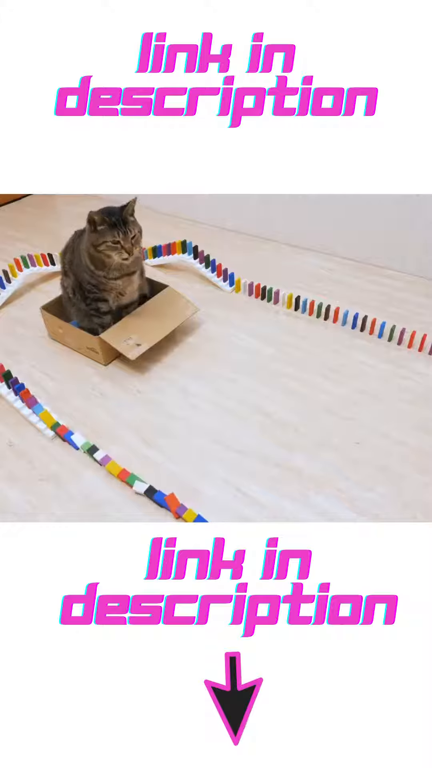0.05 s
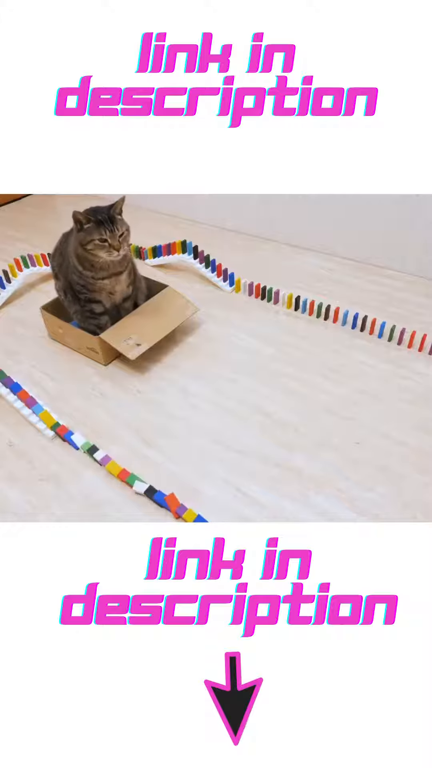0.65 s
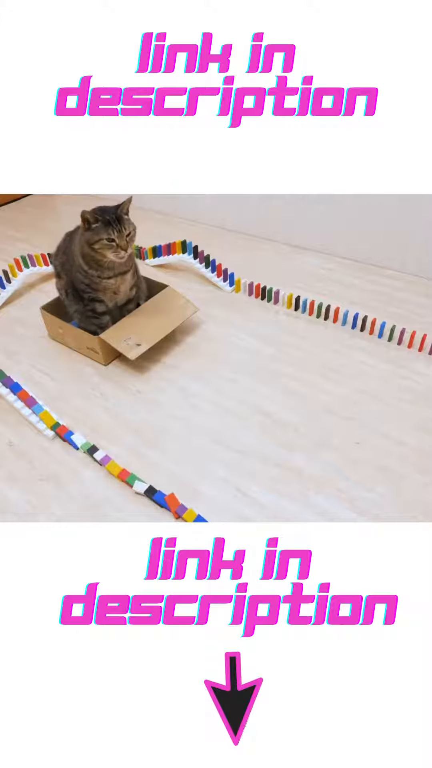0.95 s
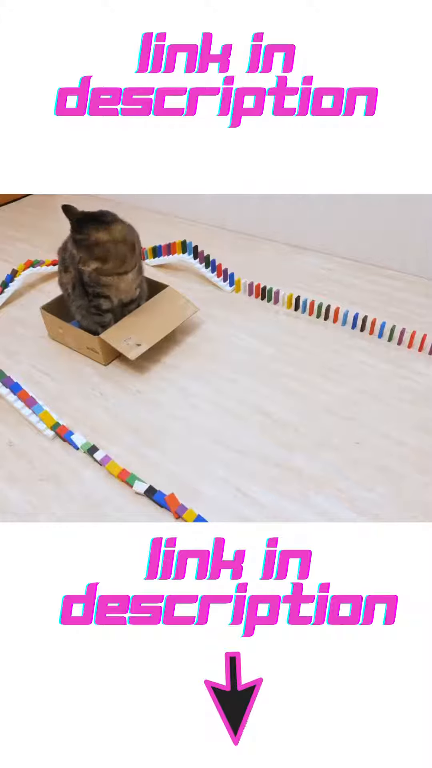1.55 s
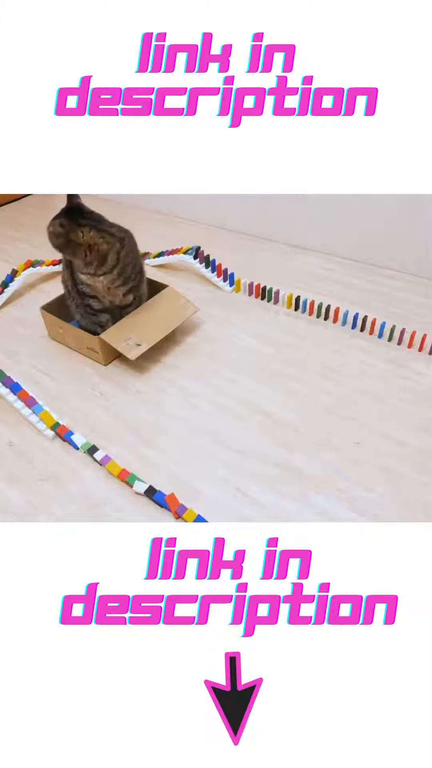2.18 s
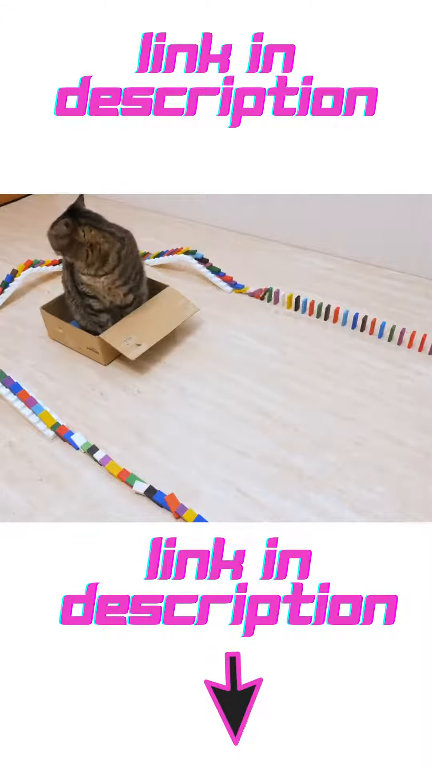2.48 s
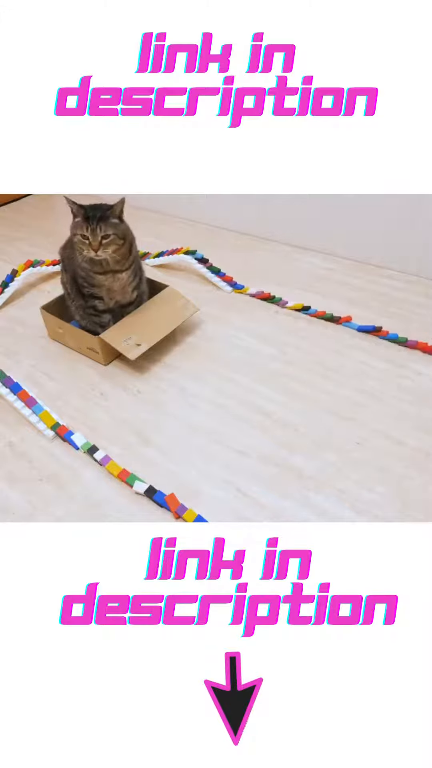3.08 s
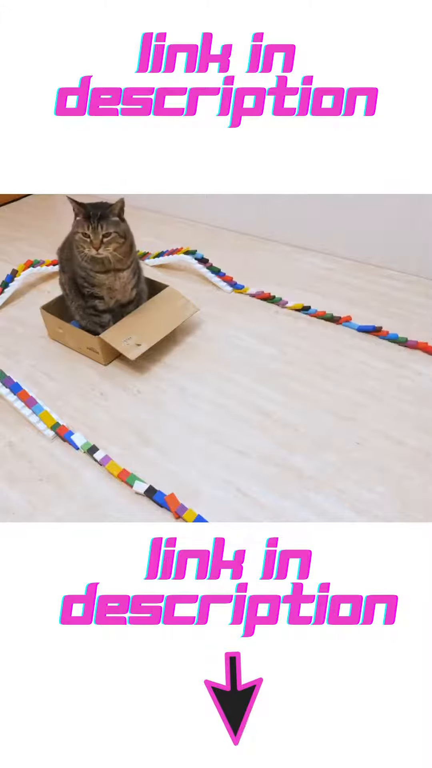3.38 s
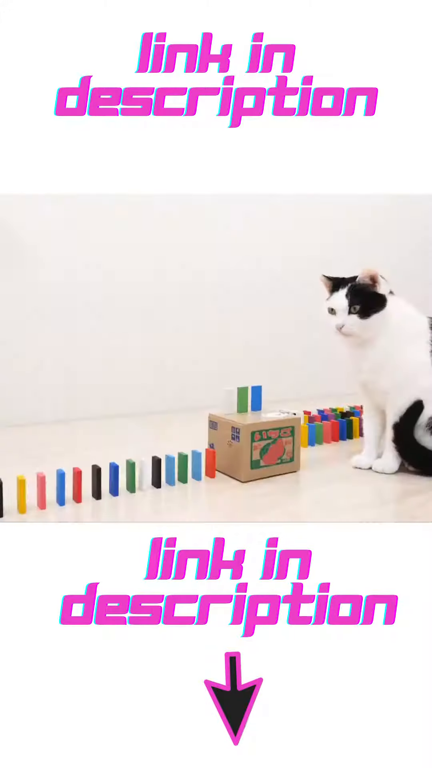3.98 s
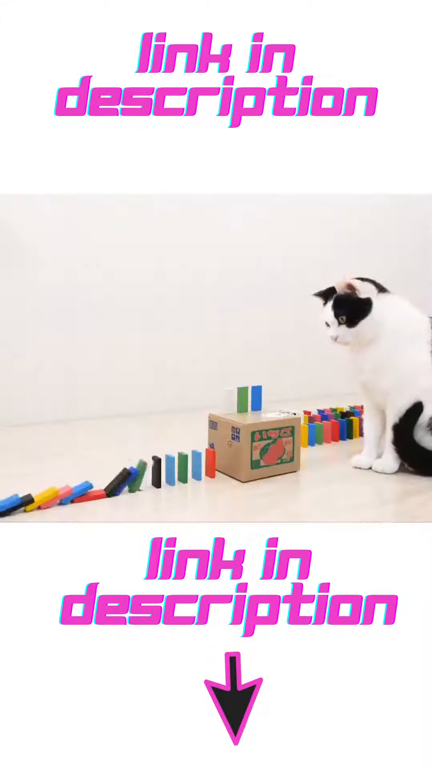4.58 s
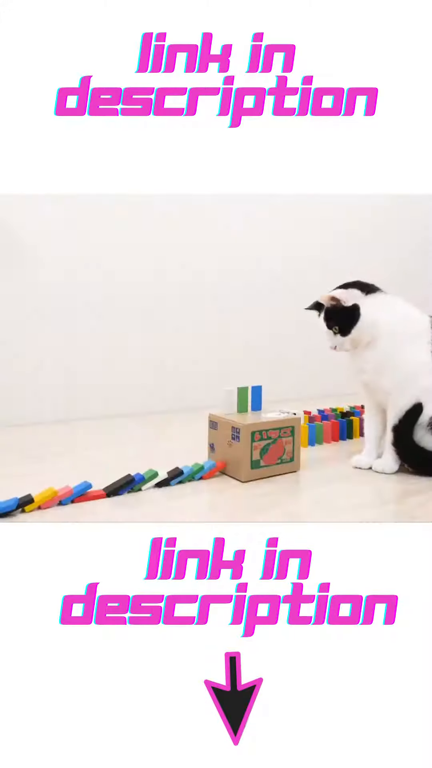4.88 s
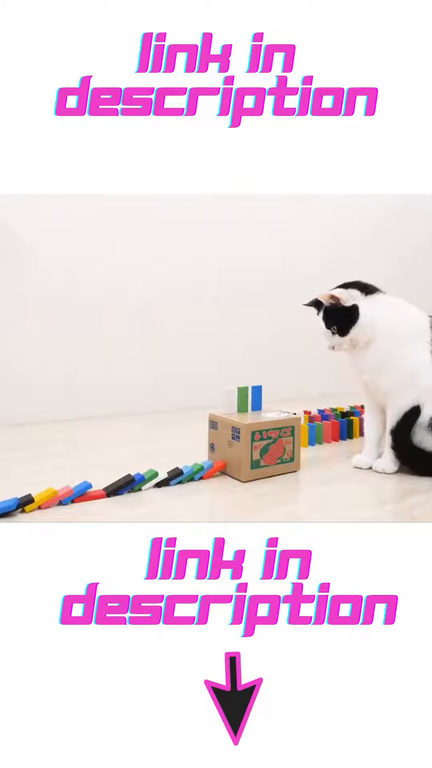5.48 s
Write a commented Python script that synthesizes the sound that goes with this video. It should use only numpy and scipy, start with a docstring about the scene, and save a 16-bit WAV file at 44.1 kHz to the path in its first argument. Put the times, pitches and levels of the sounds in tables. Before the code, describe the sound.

Small dominoes fall in a rapid, dense rattle of clicks indoors, until the last one taps a hollow cardboard box.

```python
"""A bare room with a wooden floor, one microphone: a long chain of plastic dominoes topples.
At a steady pace each tile clicks against the next and sets the fallen ones chattering and drumming
on the floor: light, high ticks in some stretches, a lower, dense rush where they crowd. Clicks and
chatter are noise bursts through five resonant voices: thud, body, clack, ring, edge.
The last tile knocks on a hollow cardboard box. Faint hiss and rumble lie underneath."""
import sys
import numpy as np
from scipy import signal
from scipy.fft import rfft, irfft, next_fast_len
from scipy.io import wavfile
from scipy.ndimage import uniform_filter1d

SR = 44100
rng = np.random.default_rng(int(sys.argv[2]) if len(sys.argv) > 2 else 0)


def persist_wave(psi):
    """Save psi, clipped to +-1, as 16-bit WAV."""
    counts = np.round(np.clip(psi, -1, 1) * 32767).astype(np.int16)
    wavfile.write(sys.argv[1], SR, np.atleast_2d(counts).T)


N = 253134

# Levels are relative; widths are resonance widths.
# clearest tile-on-tile strikes: time_s, treble_db, clack_db, edge_db, ring_hz
CLEAR_STRIKES = [(0.0872, -45, -42, -51, 8600), (0.1155, -33, -52, -53, 8800),
                 (0.1424, -39, -45, -52.5, 8400), (0.1773, -29, -45, -59.5, 9200),
                 (0.225, -23, -49, -56.5, 9200), (0.309, -42, -61, -64, 8500),
                 (0.3183, -39.5, -52, -66, 8550), (0.3534, -34, -54, -52, 8300),
                 (0.3597, -28.5, -59, -49, 8500), (0.4076, -33, -40.5, -45, 8240),
                 (0.4541, -29, -42, -54, 8370), (0.4911, -32, -41, -48, 8520),
                 (0.523, -24.5, -39.5, -54.5, 7280), (0.556, -28, -41, -57, 7430),
                 (0.574, -29, -48, -46.5, 7100), (0.5791, -22, -36, -49, 7500),
                 (0.5996, -25.5, -27.5, -43, 7080), (0.6318, -27.5, -21, -38, 7200),
                 (0.637, -21.5, -32, -41, 8900), (0.6619, -19.5, -40, -49, 8900),
                 (0.679, -24.5, -40, -49, 8900), (0.713, -19.5, -37, -43, 10560),
                 (0.768, -23.5, -29.5, -32, 8580), (0.919, -22, -43, -41.5, 8650),
                 (0.9359, -21, -53, -40, 8900), (0.9805, -14, -31, -38, 8950),
                 (0.9907, -27, -31, -41, 8400), (1.0703, -26.5, -25, -40, 8300),
                 (1.1285, -18, -32.5, -30, 8770), (1.1535, -22, -60, -40, 8370),
                 (1.2441, -30, -49, -64, 8000), (1.294, -24.5, -45.5, -42, 8100),
                 (1.375, -34.5, -65, -42, 9700), (1.415, -40, -48, -53, 8300),
                 (1.4474, -32, -42, -48.5, 8600), (1.479, -23, -62, -41.5, 7300),
                 (1.482, -12.5, -37, -29.5, 8450), (1.51, -17, -37.5, -22.5, 8100),
                 (1.5406, -12, -33, -26, 10230), (1.6479, -17.5, -32.5, -54.5, 9050),
                 (1.845, -24.5, -27, -47.5, 8800), (1.8844, -22, -23, -34.5, 8600),
                 (1.9042, -16.5, -32, -32.5, 9450), (1.9281, -20, -22.5, -45, 7600),
                 (1.9996, -28, -22.5, -50, 7200), (2.062, -25.5, -26.5, -39.5, 7700),
                 (2.106, -28.5, -35.5, -59, 8720), (2.166, -32, -53, -57.5, 9400),
                 (2.2084, -24.5, -68, -61, 8400), (2.3412, -21, -44, -42, 8200),
                 (2.372, -27.5, -40, -43, 8330), (2.4091, -25.5, -35, -29, 8300),
                 (2.436, -26, -37, -45, 8600), (2.464, -22.5, -37.5, -47, 8630),
                 (2.4975, -19, -49, -39, 8540), (2.5229, -26, -34, -30, 9350),
                 (2.559, -16.5, -29, -29.5, 7860), (2.639, -20, -32.5, -41, 7990),
                 (2.655, -19, -24, -40.5, 8370), (2.6964, -16.5, -31, -43.5, 8320),
                 (2.7935, -26, -26, -39.5, 11800), (2.8245, -18.5, -22.5, -31.5, 11900),
                 (2.849, -22.5, -36, -36.5, 11900), (2.8698, -20, -27, -48.5, 12800),
                 (2.8772, -44.5, -38, -43.5, 8400), (2.904, -40, -34, -48, 8500),
                 (2.9252, -29.5, -46, -48, 8400), (2.96, -24, -56, -52, 8770),
                 (3.0158, -26, -35, -40.5, 8330), (3.1254, -20, -34, -44.5, 8480),
                 (3.1822, -33, -32, -46, 8660), (3.2533, -36, -26.5, -56, 8450),
                 (3.294, -24, -30, -39.5, 13500), (3.3251, -28, -38, -36, 13400),
                 (3.3977, -28.5, -33.5, -32.5, 10980), (3.5031, -43, -46, -48.5, 8280),
                 (3.5542, -27, -34.5, -39, 9950), (3.6571, -44.5, -31.5, -51, 8400),
                 (3.6638, -18, -32, -22.5, 9630), (3.6849, -19, -41, -33.5, 13100),
                 (3.7295, -35, -69, -43.5, 7950), (3.765, -38, -48, -35.5, 8150),
                 (3.7838, -27.5, -39, -39.5, 9150), (3.8116, -33, -39.5, -34, 7700),
                 (3.8414, -26, -36, -35, 10350), (3.859, -42, -39, -40, 8100),
                 (3.8691, -39, -39, -50, 8600), (3.8795, -31, -36, -31.5, 8200),
                 (3.902, -25, -34, -31.5, 9100), (3.912, -27.5, -38, -38.5, 10900),
                 (3.919, -31, -39, -37.5, 8800), (3.9255, -31.5, -46, -33.5, 9000),
                 (3.9488, -29, -37, -44, 7800), (3.9674, -31, -38, -48.5, 8400),
                 (3.9872, -23, -30, -41.5, 9000), (3.995, -24, -46, -42.5, 9170),
                 (4.0056, -31.5, -38, -46.5, 8500), (4.028, -20, -37, -34.5, 9200),
                 (4.035, -30.5, -30, -45.5, 8900), (4.0495, -31, -51, -39.5, 9500),
                 (4.0574, -47, -40, -47, 8500), (4.1176, -23, -42, -45, 8250),
                 (4.1604, -34, -32.5, -45, 8100), (4.195, -40, -37, -57, 8320),
                 (4.2278, -30, -31, -47.5, 9500), (4.254, -28.5, -34, -44, 11180),
                 (4.2766, -34, -30, -37, 8900), (4.2936, -26.5, -35, -39.5, 8600),
                 (4.313, -26, -30, -42, 8900), (4.3422, -35.5, -33.5, -49.5, 8550),
                 (4.3666, -30, -43, -43.5, 8500), (4.392, -30, -32.5, -46.5, 8800),
                 (4.419, -24, -29.5, -40, 8850), (4.4443, -27.5, -29.5, -46, 8000),
                 (4.4743, -25.5, -34, -42.5, 8450), (4.499, -31, -35, -45.5, 8700),
                 (4.5092, -35.5, -31, -50, 8500), (4.5491, -30, -34.5, -41, 8270),
                 (4.5575, -41, -34.5, -53, 8400), (4.5794, -27.5, -32, -38.5, 8400),
                 (4.6058, -24, -36, -48, 8400), (4.6362, -24, -33, -54, 8400),
                 (4.6632, -20.5, -37, -52.5, 8260), (4.6924, -44, -36, -53, 8200),
                 (4.7046, -36, -38, -49, 8250), (4.7254, -29, -35.5, -46.5, 8320),
                 (4.7465, -31, -43, -39.5, 8300), (4.7533, -27, -41, -50.5, 8300),
                 (4.764, -49, -49, -55, 8340), (4.776, -22.5, -38, -30.5, 8900),
                 (4.806, -29, -40, -50, 12100), (4.832, -35, -34, -45, 11700),
                 (4.8374, -34, -31.5, -53, 8650), (4.86, -29, -35, -36.5, 8500),
                 (4.87, -29, -32, -38, 8400), (5.038, -52, -45.5, -76, 8500)]
# strike character along the chain: time_s, tiles_per_s, nearness_db, ring_t60_s, scuff_db
CHAIN = [(.1, 22, 2.5, 0.037, -18), (.47, 24, -1.5, 0.019, -22), (.7, 35, -4, 0.041, -14.5),
         (1.7, 32.5, -1.5, 0.073, -1), (2.35, 36, 0, 0.035, -18), (2.9, 39.2, -2, 0.043, -17),
         (3.66, 36, 2.5, 0.0087, -7), (3.85, 36, 3, 0.0064, -15), (4.3, 51, -0.5, 0.016, -23),
         (4.85, 36, 0.5, 0.01, -21)]
# chatter grain: time_s, contacts_per_s, size_spread_db, flare_db
GRAIN = [(.1, 1400, -2.5, -1), (.42, 430, -1.5, 17), (.65, 1020, -2.5, 4), (1.9, 1480, -0.5, 2),
         (3.6, 1340, 4.5, 3), (3.85, 466, -7, -8), (4.8, 500, 2, 18.5)]
# voices thud, body, clack, ring, edge: low_hz, high_hz, chatter_db, click_db
VOICES = [(244, 1070, -1.5, -32), (690, 3000, 0, -15), (2900, 6050, -3, -15), (6370, 10020, -1.5, -27.5),
          (10050, 15300, -1, -16)]
# broad tile spectrum: freq_hz, density_db
TILE_SPECTRUM = [(410, -29.5), (700, -12.5), (1110, -12), (1660, -9.5), (2300, -8), (3000, -9),
                 (4000, -7.5), (5260, -7), (6400, -11.5), (8650, -12.5), (11100, -24), (13300, -22.5),
                 (15400, -22.5), (16000, -26)]
# thud, floor drumming under the tiles: time_s, level_db, pitch_hz, width_hz
FLOOR_MODE = [(0, -54.5, 463, 201), (.3, -79, 420, 200), (.6, -66, 440, 201), (.64, -55, 504, 110),
              (.72, -52.5, 384, 120), (.83, -45.5, 295, 100), (.88, -52.5, 300, 89), (.98, -43, 315, 74),
              (1.08, -50.5, 300, 59), (1.16, -80, 294, 80), (1.4, -78.5, 330.3, 200),
              (1.52, -56.5, 359, 152.7), (1.63, -44, 400, 111), (1.77, -53, 288, 140),
              (1.88, -44.5, 473, 235), (2, -48, 520, 195), (2.07, -52, 326, 80), (2.22, -104.5, 403, 200),
              (2.45, -68, 414, 205), (2.59, -42, 503, 140), (2.75, -47.5, 453, 256),
              (2.9, -42.5, 518, 109.6), (3, -47, 472.4, 100), (3.09, -41.5, 445, 50),
              (3.17, -44.5, 418, 200), (3.25, -40.5, 350, 286), (3.35, -49, 470, 203),
              (3.65, -46, 435, 169), (3.78, -54, 348.5, 119), (4.05, -53.5, 396, 171), (4.3, -49, 353, 150),
              (4.87, -52.5, 372, 149)]
# body, low mids: time_s, level_db
BODY_LEVEL = [(0, -45.5), (.25, -54), (.47, -53.5), (.64, -36), (.77, -46.5), (1.08, -48), (1.3, -59),
              (1.5, -49), (1.65, -39), (1.83, -47.5), (2.28, -55), (2.6, -45.5), (3.75, -47.5),
              (4.28, -42.5), (4.87, -44)]
# hollow body resonance: time_s, pitch_hz, width_hz, prominence_db
BODY_MODE = [(0, 1580, 703, 0.5), (.4, 1430, 605, 9), (.56, 1710, 300, 8.5), (.64, 1910, 425, 21.5),
             (.75, 1990, 500, 1), (1.1, 1740, 500, -0.5), (1.3, 1380, 594, 10), (1.56, 1677, 403, 3),
             (1.66, 1660, 256, 6.5), (1.8, 2340, 595, -12.5), (2.1, 1840, 600, -7.5), (2.3, 1320, 600, 13),
             (2.55, 1700, 400, -2), (2.9, 1740, 393.4, -4.5), (3.6, 1830, 400, -4), (3.9, 2350, 700, -28),
             (4.3, 2220, 625, -2), (4.87, 2130, 609, 0)]
# clack, force of the rush: time_s, level_db
CLACK_LEVEL = [(0, -33), (.08, -38), (.24, -52), (.47, -52.5), (.64, -28), (.76, -33.5), (.89, -43.5),
               (1.0, -26.5), (1.13, -42.5), (1.22, -57.5), (1.43, -50), (1.58, -32), (1.7, -26.5),
               (1.78, -38), (1.93, -26.5), (2.01, -32.5), (2.25, -59.5), (2.5, -38.5), (2.65, -27),
               (2.75, -32), (2.9, -25), (3.02, -34.5), (3.34, -31.5), (3.66, -36.5), (3.76, -47),
               (3.95, -35.5), (4.3, -38), (4.87, -37.5)]
# lower band edge of the clack: time_s, low_hz
CLACK_LOW = [(0, 2830), (.6, 2920), (1.1, 3000), (1.55, 3060), (1.68, 2400), (1.8, 2400), (1.92, 3050),
             (2.5, 2780), (3.65, 2875), (3.85, 2700), (4.87, 2540)]
# main resonance, narrow where tiles lie alike: time_s, pitch_hz, width_hz, prominence_db, overtone_db
CLACK_MODE = [(0, 4300, 1200, -14, -5), (.35, 4900, 700, 1, -7.5), (.6, 4480, 890, 7, -13),
              (.7, 4250, 1300, -17.5, -5), (.82, 3300, 550, 13, -12.5), (.96, 3400, 505, 11.5, -6.5),
              (1.03, 3460, 764, -1, -2.5), (1.3, 5030, 900, 2.5, -7), (1.56, 4540, 1100, 2.5, -11),
              (1.64, 3920, 1500, -3.5, -12), (1.72, 3150, 910, 25.5, -15), (1.81, 3400, 805, 18, -22.5),
              (1.92, 3845, 930, -3.5, -8), (2.1, 4260, 1310, -10, 9.5), (2.45, 4480, 710, 11, -12),
              (2.54, 3870, 1475, -5, -41), (2.6, 3530, 610, 14, -4.5), (2.9, 3400, 385, 15.5, -9),
              (3.1, 3440, 340, 15.5, -16.5), (3.35, 3495, 300, 16, -10.5), (3.68, 3480, 300, 7.5, -3.5),
              (3.8, 3860, 1200, 4.5, -5.5), (4.05, 3760, 1300, 13, -0.5), (4.3, 3320, 1280, 0.5, -11),
              (4.87, 3700, 1280, 10, -8.5)]
# treble, ring and edge: time_s, level_db
TREBLE_LEVEL = [(0, -39), (.12, -51), (.44, -61.5), (.65, -33.5), (.85, -53), (.98, -36.5), (1.06, -63),
                (1.15, -38), (1.26, -68.5), (1.45, -46), (1.529, -33), (1.8, -48), (1.93, -41), (2.05, -43),
                (2.18, -52.5), (2.33, -64.5), (2.58, -42), (2.7, -41), (3.05, -47), (3.25, -45.5),
                (3.38, -41), (3.8, -47.5), (3.98, -42.5), (4.15, -44), (4.87, -49.5)]
# bright tile ring: time_s, pitch_hz, width_hz, prominence_db
RING_MODE = [(0, 9000, 700, 12), (.45, 8700, 600, 1), (.55, 7200, 600, 3.5), (.65, 7400, 700, 11),
             (.76, 8600, 700, 0.5), (.97, 9070, 350, 13), (1.2, 8350, 600, 3), (1.5, 8000, 900, 3.5),
             (1.68, 8800, 700, 13.5), (1.92, 8600, 800, 12), (2.35, 8300, 600, 1.5),
             (2.52, 7540, 900, -7.5), (2.68, 8600, 600, 12), (3.4, 8450, 600, -8.5), (3.9, 8300, 700, -2.5),
             (4.3, 9000, 600, 4.5), (4.87, 8100, 500, 2)]
# edge voice against the treble: time_s, offset_db
EDGE_TILT = [(0, 0), (.6, -14), (.98, 2), (1.17, 3), (1.27, -20), (1.45, -4.5), (1.57, -4), (1.7, -5),
             (1.9, -5), (2.6, -1), (2.85, 3), (3.12, -7.5), (3.35, 0.5), (3.9, -5), (4.1, -3), (4.87, -7.5)]
# a sliding edge sings briefly: start_s, length_s, pitch_hz, prominence_db
GLINTS = [(1.497, 0.11, 10900, 6.5), (1.69, 0.064, 12000, 13), (2.73, 0.14, 12000, 18.5),
          (3.275, 0.082, 13700, 28), (3.37, 0.049, 11200, 16.5), (3.537, .07, 14600, 9.5),
          (4.236, 0.057, 11200, 17), (4.747, .11, 12070, 17.5)]
# last tile hits the box and bounces: time_s, level_db
KNOCKS = [(4.8854, -15.5), (4.8892, -19), (4.8913, -15)]
# cardboard wall modes: pitch_hz, level_db, t60_s
BOX_MODES = [(664, 9, 0.06), (1182, 6, 0.089), (1271, 2.5, 0.061), (1365, -2, 0.041), (1520, -16, 0.035),
             (1652, -15, 0.054)]
# room decay: freq_hz, t60_s
ROOM_DECAY = [(300, 0.85), (650, 0.49), (1200, 0.51), (2400, 0.63), (6000, 0.51), (9000, 0.39),
              (14000, 0.36)]
# room hiss: freq_hz, density_db
HISS_SPECTRUM = [(15, -28.5), (25, -15), (61, -28), (173, -10.5), (253, -14), (313, -15.5), (523, -22.5),
                 (648, -3), (762, -18), (826, -8.5), (4040, -17.5), (6550, -20.5), (8130, -15),
                 (10100, -25), (15500, -29)]
# room rumble: time_s, level_db
RUMBLE_LEVEL = [(0, -90), (1.7, -86.5), (2.4, -85.5), (3.3, -78), (4.1, -76.5), (5.1, -94), (5.74, -100)]

BOX_HIT_S = KNOCKS[0][0]
TIME_S = np.arange(N) / SR


def clicks(crack_t60_s, slide_db, slide_t60_s, scuff_t60_s, rebound_db, ring_db):
    """Each tile slides into a crack, rebounds within milliseconds, scuffs and rings."""
    lead_s, fft_size = .015, 4096
    track, t = np.zeros(N), np.arange(SR // 16) / SR - lead_s
    hz = np.fft.rfftfreq(fft_size, 1 / SR) + 1
    ring_band = rfft(band(signal.unit_impulse(fft_size), 6000, 13000))
    for time_s, treble_db, clack_db, edge_db, ring_hz in list(CLEAR_STRIKES) + faint_strikes():
        _, _, ring_t60_s, scuff_db = row_at(CHAIN, time_s)
        t60_s = crack_t60_s * np.exp(.53 * rng.standard_normal())
        blow = fade(t, t60_s) + amp(rebound_db) * fade(t - rng.uniform(.00087, .003), t60_s)
        rub = amp(slide_db) * fade(-t, slide_t60_s) + amp(scuff_db) * fade(t, scuff_t60_s)
        responses = tile_responses(hz, time_s)
        force = (blow + rub) * rng.standard_normal(len(t))
        voices = irfft(rfft(force, fft_size) * responses)[:, :len(t)]
        # same body-to-clack balance as the surrounding chatter
        body_db = clack_db + at(BODY_LEVEL, time_s) - at(CLACK_LEVEL, time_s)
        levels_db = [body_db, body_db, clack_db, treble_db, edge_db]
        click = sum(amp(db + click_db) * unit_rms(voice)
                    for voice, db, (*_, click_db) in zip(voices, levels_db, VOICES))
        # touching tiles ring slightly apart
        pitches_hz = ring_hz * rng.normal(1, .014, size=(3, 1))
        ring = np.sin(2 * np.pi * pitches_hz * t).sum(axis=0) * fade(t, ring_t60_s)
        ring = irfft(rfft(ring, fft_size) * ring_band)[:len(t)]
        add(track, time_s + .0014 - lead_s, click + amp(ring_db + treble_db) * unit_rms(ring))
    return track


def faint_strikes(jitter_steps=.15, spread_db=2.5, ring_hz=8450, spread_hz=367):
    """Tiles fall at a steady pace: fainter strikes fill the steps between the clear ones."""
    rows = []
    for (start_s, *_), (end_s, *_) in zip(CLEAR_STRIKES, CLEAR_STRIKES[1:]):
        tiles_per_s = row_at(CHAIN, start_s)[0]
        steps = round((end_s - start_s) * tiles_per_s) if end_s < BOX_HIT_S else 1
        for step, (late, force, detune) in zip(range(1, steps), rng.standard_normal((16, 3))):
            time_s = start_s + (end_s - start_s) * (step + jitter_steps * late) / steps
            treble_db = at(TREBLE_LEVEL, time_s) + spread_db * force
            clack_db = at(CLACK_LEVEL, time_s) + spread_db * force
            edge_db = treble_db + at(EDGE_TILT, time_s)
            rows.append((time_s, treble_db + 12.5, clack_db - 2, edge_db, ring_hz + spread_hz * detune))
    return rows


def tile_responses(hz, time_s, extra_peak_db=5.5):
    """One tile alone: five voices, detuned together, more prominent than in the chatter."""
    detune = np.exp(.055 * rng.standard_normal())
    powers = []
    for (_, high_hz, *_), controls in zip(VOICES, voice_controls(time_s)):
        _, low_hz, pitch_hz, width_hz, peak_db, overtone_db = controls
        powers.append(voice_power(hz, low_hz, high_hz, pitch_hz * detune, width_hz,
                                  peak_db + extra_peak_db, overtone_db))
    return minimum_phase(np.array(powers))


def chatter(stop_t60_s, frame=1024):
    """Contacts excite five resonances that vary from tile to tile and drift along the chain."""
    hz, t, spectra = signal.stft(contacts(contact_t60_s=.0029, settle_t60_s=.027), SR, nperseg=frame)
    power = 0
    for (_, high_hz, chatter_db, _), controls in zip(VOICES, voice_controls(t)):
        level_db, low_hz, pitch_hz, *resonance = controls
        pitch_hz = pitch_hz * (1 + .01 * rng.standard_normal(len(t)))
        voice = voice_power(hz[:, None] + 1, low_hz, high_hz, pitch_hz, *resonance)
        power = power + amp(level_db + chatter_db) ** 2 * voice
    coming_to_rest = fade(np.maximum(t - BOX_HIT_S, 0), stop_t60_s)
    rattle = signal.istft(spectra * np.sqrt(power) * coming_to_rest, SR, nperseg=frame)[1][:N]
    return band(rattle, 160, SR / 2)


def contacts(contact_t60_s, settle_t60_s):
    """Tiny hard contacts, each a noise burst, flare after every clear strike and settle."""
    contacts_per_s, spread_db, flare_db = row_at(GRAIN, TIME_S)
    t = np.arange(SR // 8) / SR
    stir = np.ones(N)
    for time_s, *_ in CLEAR_STRIKES:
        add(stir, time_s, amp(flare_db[round(time_s * SR)]) * fade(t, settle_t60_s))
    sizes = stir * amp(spread_db * np.minimum(rng.exponential(size=N), 3))
    impacts = (rng.random(N) < contacts_per_s / SR) * sizes ** 2
    power = np.abs(signal.fftconvolve(impacts, fade(t, contact_t60_s) ** 2)[:N])
    # even out the rattle over about 40 ms, so the level curves set its loudness
    power /= np.abs(uniform_filter1d(power, size=1800)) + 1e-9
    return np.sqrt(power) * rng.standard_normal(N)


def voice_controls(t, glint_width_hz=380, overtone_db=-14, floor_peak_db=22, floor_overtone_db=-13):
    """Per voice at time t: level_db, low_hz, pitch_hz, width_hz, prominence_db, overtone_db."""
    thud_low_hz, body_low_hz, _, ring_low_hz, edge_low_hz = (voice[0] for voice in VOICES)
    floor_db, floor_hz, floor_width_hz = row_at(FLOOR_MODE, t)
    glints = np.array(GLINTS)
    latest = np.maximum(np.searchsorted(glints[:, 0], t) - 1, 0)
    start_s, length_s, glint_hz, glint_db = glints[latest].T
    glint_db = np.where((t >= start_s) & (t < start_s + length_s), glint_db, -60)
    treble_db = at(TREBLE_LEVEL, t)
    return [(floor_db, thud_low_hz, floor_hz, floor_width_hz, floor_peak_db, floor_overtone_db),
            (at(BODY_LEVEL, t), body_low_hz, *row_at(BODY_MODE, t), overtone_db),
            (at(CLACK_LEVEL, t), at(CLACK_LOW, t), *row_at(CLACK_MODE, t)),
            (treble_db, ring_low_hz, *row_at(RING_MODE, t), overtone_db),
            (treble_db + at(EDGE_TILT, t), edge_low_hz, glint_hz, glint_width_hz, glint_db, overtone_db)]


def voice_power(hz, low_hz, high_hz, pitch_hz, width_hz, peak_db, overtone_db):
    """Unit-mean power spectrum: a steep band with a resonance and its second bending mode."""
    body_low_hz = VOICES[1][0]
    colour = amp(at_hz(TILE_SPECTRUM, np.maximum(hz, body_low_hz))) ** 2
    passband = colour / (1 + (low_hz / hz) ** 18) / (1 + (hz / high_hz) ** 18)
    first, second = (1 / (1 + ((hz - ratio * pitch_hz) / width_hz) ** 2) ** 3 for ratio in (.98, 1.532))
    power = passband * (1 + amp(peak_db) ** 2 * (first + amp(overtone_db) ** 2 * second))
    return power / power.mean(axis=0)


def box(crack_db, crack_t60_s, slap_db, slap_t60_s):
    """The hollow box answers each knock with a crack, a papery slap and its wall modes."""
    track, t = np.zeros(N), np.arange(SR // 4) / SR
    for time_s, knock_db in KNOCKS:
        # soft walls flex, so their pitch wavers
        flexed_s = t + .25 * np.cumsum(rng.standard_normal(len(t))) / SR
        walls = sum(amp(db + rng.standard_normal()) * np.sin(2 * np.pi * hz * flexed_s) * fade(t, t60_s)
                    for hz, db, t60_s in BOX_MODES)
        crack = band(rng.standard_normal(len(t)) * fade(t, crack_t60_s), 1200, 7000)
        slap = band(rng.standard_normal(len(t)) * fade(t, slap_t60_s), 830, 3500)
        add(track, time_s, amp(knock_db - 19) * (walls + amp(crack_db) * crack + amp(slap_db) * slap))
    return band(band(track, 560, 15000), 560, 15000)


def room(x, early_db, tail_db):
    """Near-wall echoes, then a diffuse tail, shorter in the treble; both redrawn at random every 1/6 s."""
    hop, wet = SR // 6, np.zeros(N)
    for start in range(0, N - hop, hop):
        hz, t, spectra = signal.stft(rng.standard_normal(SR // 2), SR, nperseg=256)
        decay = fade(t, at_hz(ROOM_DECAY, hz)[:, None])
        tail = signal.istft(spectra * decay, SR, nperseg=256)[1]
        tail = np.pad(tail / np.linalg.norm(tail), (SR // 200, 0))  # 5 ms pre-delay
        echoes = np.zeros(len(tail))
        echoes[(SR * rng.uniform(.002, .02, size=10)).astype(int)] = rng.standard_normal(10)
        response = amp(tail_db) * tail + amp(early_db) * echoes / np.linalg.norm(echoes)
        part = x[start:start + hop + hop // 2]
        crossfade = signal.windows.tukey(len(part), 2 / 3) ** .5
        add(wet, start / SR, signal.fftconvolve(part * crossfade, response))
    return wet


def room_tone(hiss_db, rumble_gain_db):
    """Faint steady hiss over a low rumble that swells and fades."""
    hiss = filtered(rng.standard_normal(N), lambda hz: amp(at_hz(HISS_SPECTRUM, hz)))
    rumble = band(rng.standard_normal(N), 35, 210)
    rumble_db = rumble_gain_db + at(RUMBLE_LEVEL, TIME_S)
    return amp(hiss_db) * unit_rms(hiss) + amp(rumble_db) * unit_rms(rumble)


def amp(db):
    return 10 ** (np.asarray(db) / 20)


def unit_rms(x):
    return x / np.sqrt(np.mean(x ** 2) + 1e-20)


def fade(t, t60_s):
    """Exponential decay from t = 0, silent before."""
    return (t >= 0) * np.exp(-np.log(1000) * np.abs(t) / t60_s)


def add(track, start_s, sound):
    part = track[max(round(start_s * SR), 0):][:len(sound)]
    part += sound[:len(part)]


def row_at(rows, time_s):
    """All value columns, interpolated in time."""
    times_s, *columns = np.transpose(rows)
    return [np.interp(time_s, times_s, column) for column in columns]


def at(rows, time_s):
    return row_at(rows, time_s)[0]


def at_hz(rows, hz):
    """Value interpolated over log frequency."""
    freqs_hz, values = np.transpose(rows)
    return np.interp(np.log(hz + 1), np.log(freqs_hz + 1), values)


def band(x, low_hz, high_hz):
    edges_hz = [low_hz, min(high_hz, SR / 2 - 1)]
    return signal.sosfilt(signal.butter(4, edges_hz, btype="band", fs=SR, output="sos"), x)


def filtered(x, response):
    """FFT filter with gain response(hz)."""
    size = next_fast_len(len(x) + 8192)
    return irfft(rfft(x, size) * response(np.fft.rfftfreq(size, 1 / SR)), size)[:len(x)]


def minimum_phase(power):
    """Response with this power spectrum that rings only after the blow."""
    cepstrum = irfft(np.log(power + 1e-7) / 2)
    half = cepstrum.shape[-1] // 2
    return np.exp(rfft(cepstrum * np.r_[1, np.full(half - 1, 2), np.zeros(half)]))


def scene():
    """Chatter, clicks and the final knock in one room; both channels alike."""
    rattle = chatter(stop_t60_s=.13)
    strikes = clicks(crack_t60_s=.005, slide_db=-15.5, slide_t60_s=.03, scuff_t60_s=.069,
                     rebound_db=-2, ring_db=-26)
    knock = box(crack_db=11.5, crack_t60_s=.011, slap_db=14.5, slap_t60_s=.035)
    nearness_db = row_at(CHAIN, TIME_S)[1]
    direct = amp(-5) * rattle + amp(nearness_db) * strikes + knock
    wet = room(rattle, early_db=-9, tail_db=-13.5)
    wet += room(strikes + amp(-8) * knock, early_db=-10.5, tail_db=-3)
    return np.tile(direct + wet + room_tone(hiss_db=-73.5, rumble_gain_db=4.5), (2, 1))


def record(dry, cutoff_hz=15900):
    """Brick-wall low-pass."""
    return np.array([filtered(channel, lambda hz: hz < cutoff_hz) for channel in dry])


dry = scene()
out = record(dry)
persist_wave(out)
```